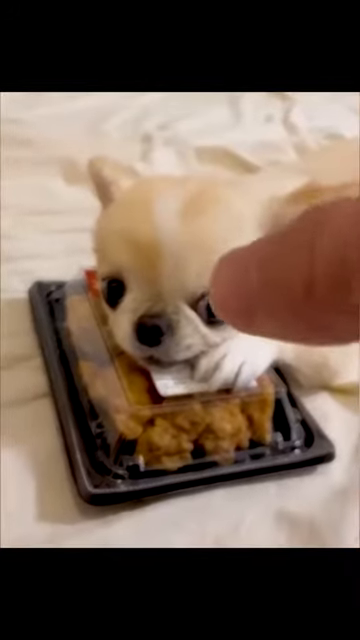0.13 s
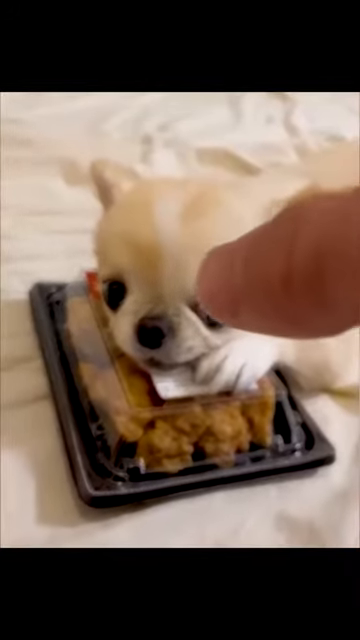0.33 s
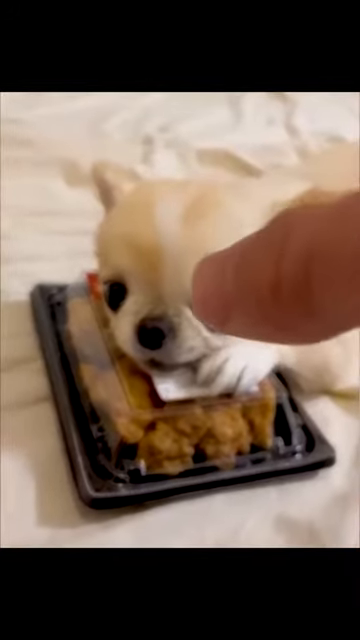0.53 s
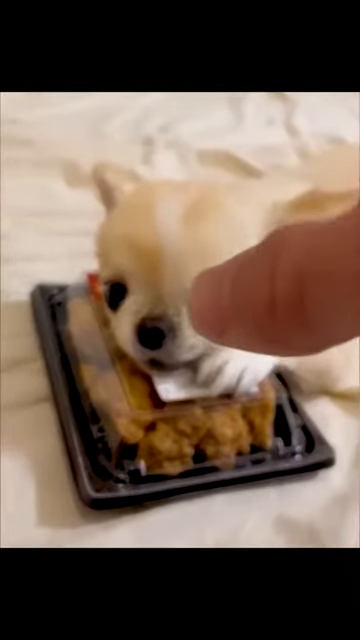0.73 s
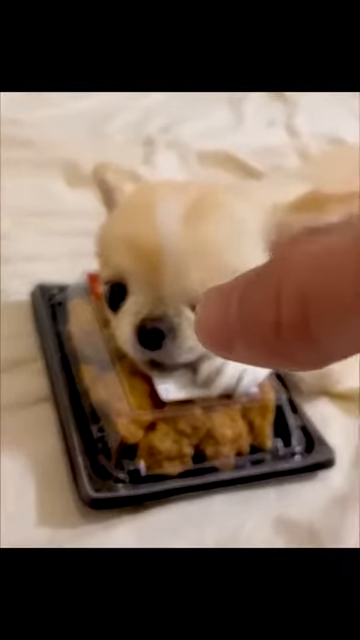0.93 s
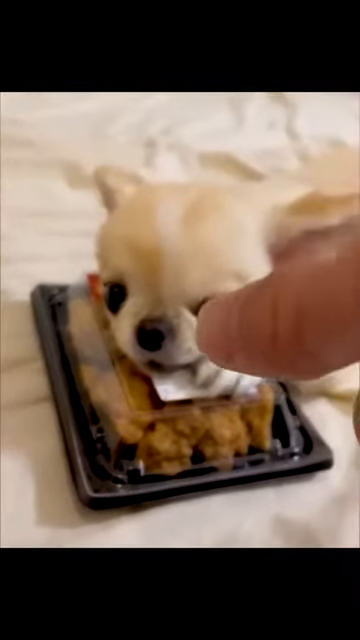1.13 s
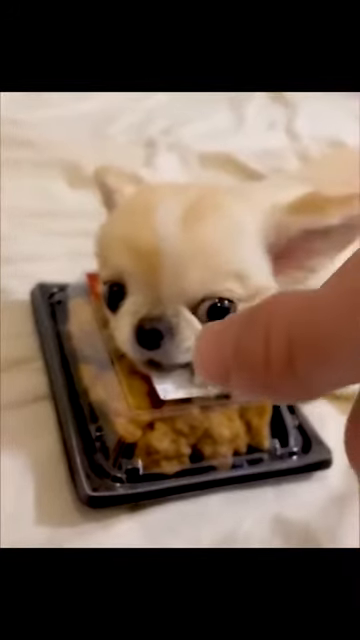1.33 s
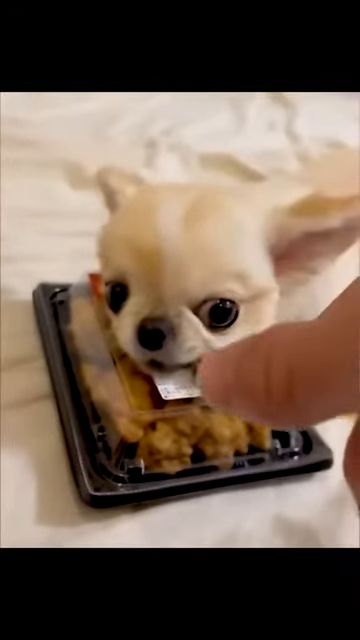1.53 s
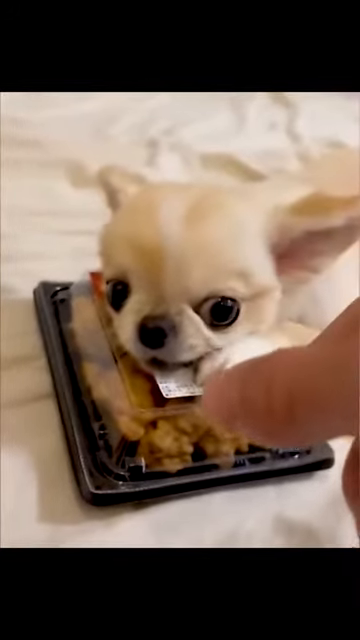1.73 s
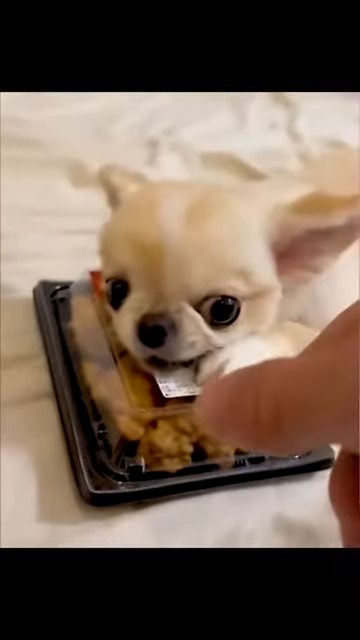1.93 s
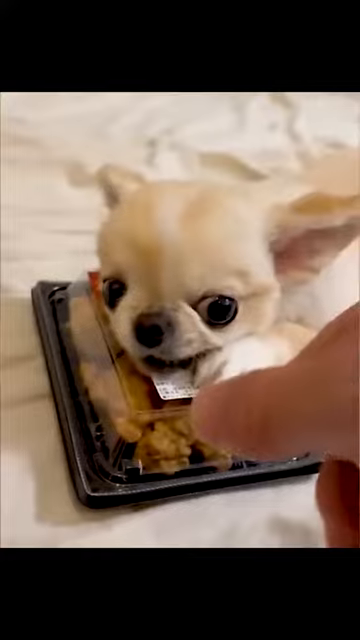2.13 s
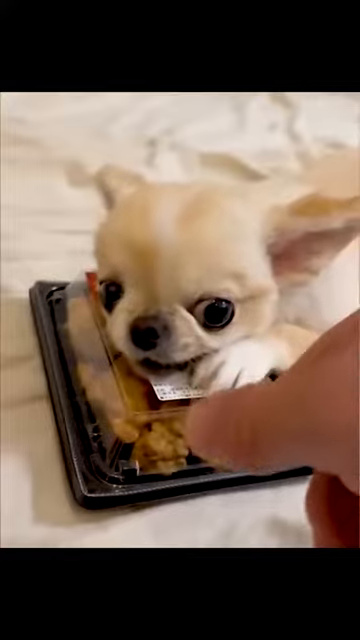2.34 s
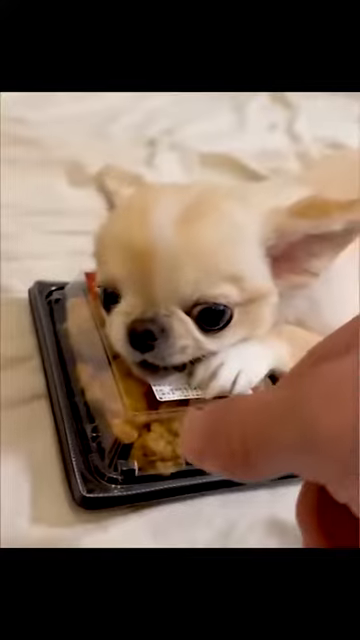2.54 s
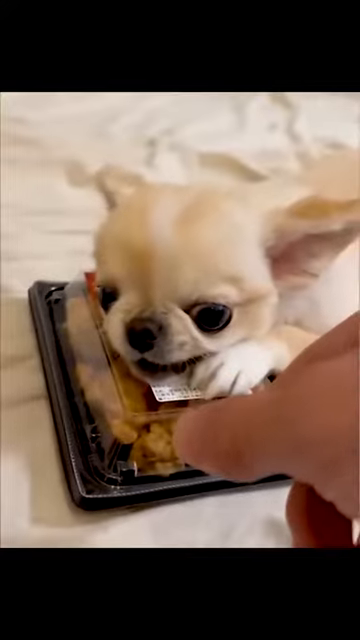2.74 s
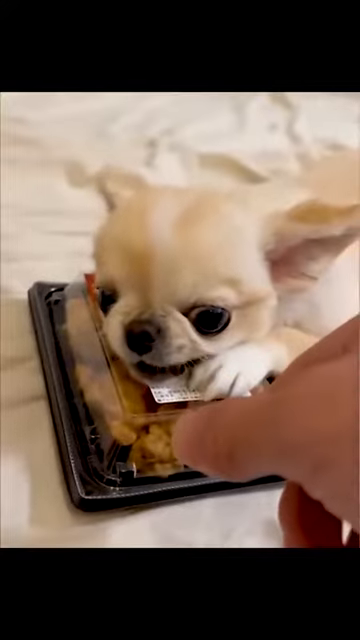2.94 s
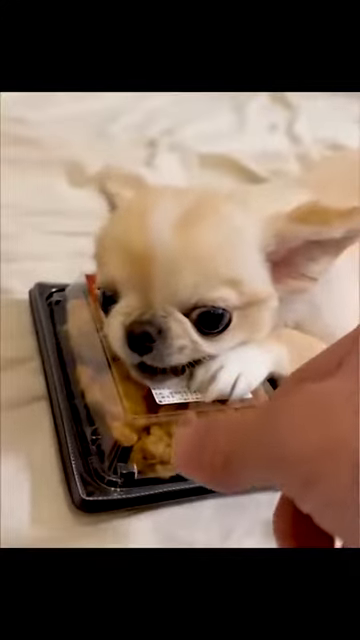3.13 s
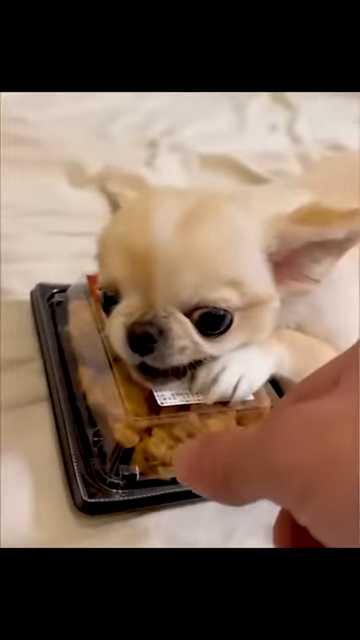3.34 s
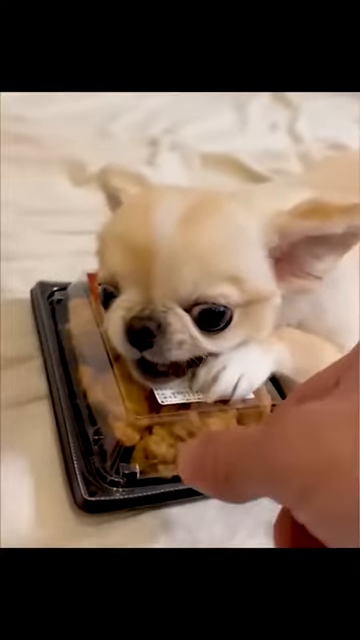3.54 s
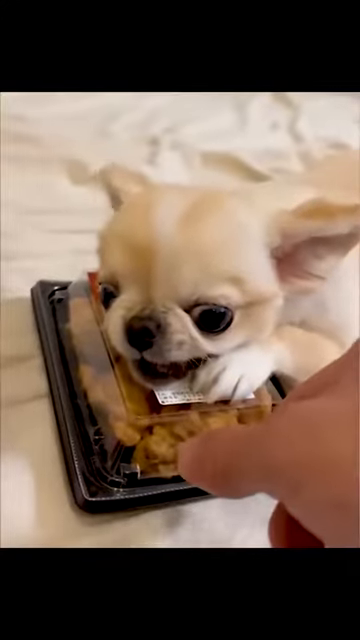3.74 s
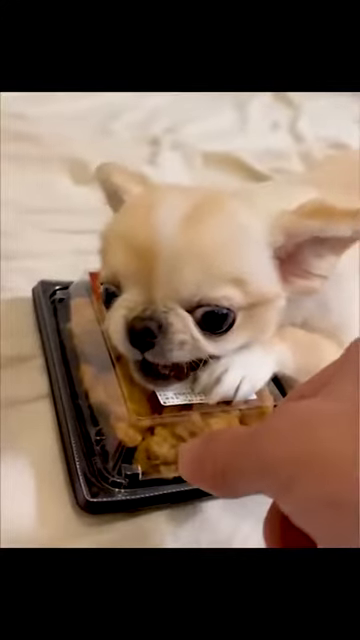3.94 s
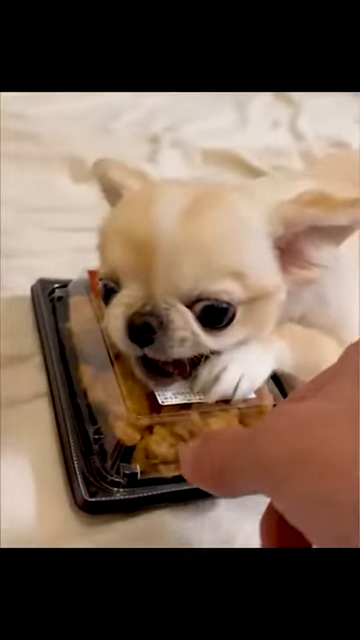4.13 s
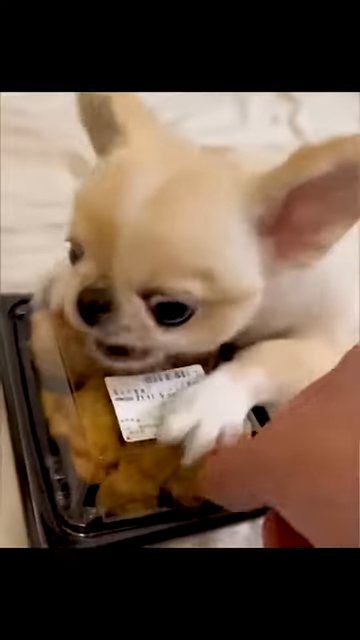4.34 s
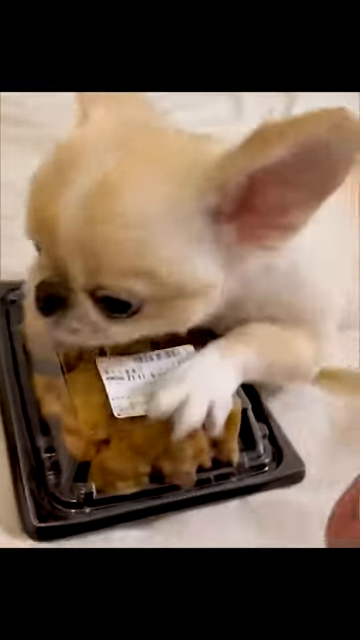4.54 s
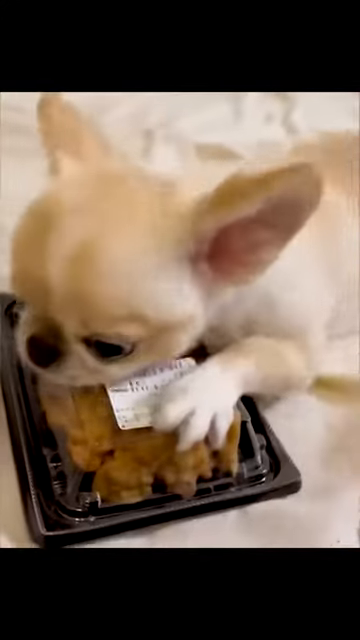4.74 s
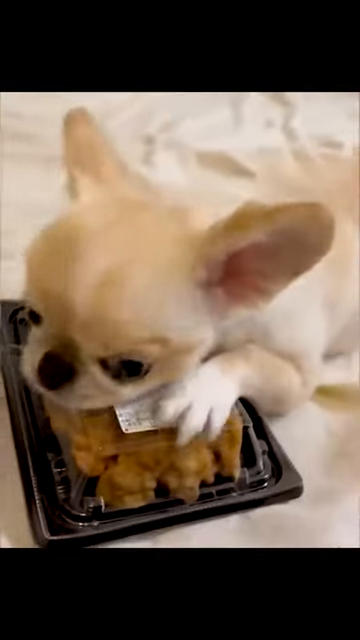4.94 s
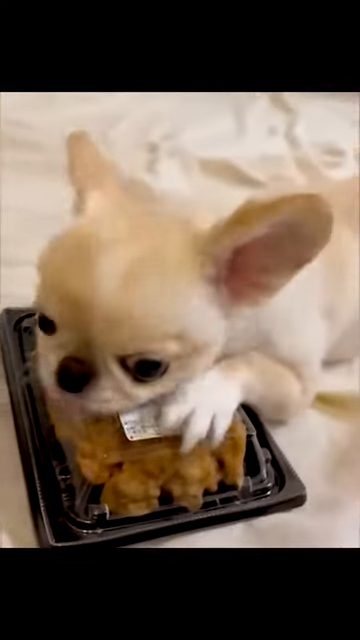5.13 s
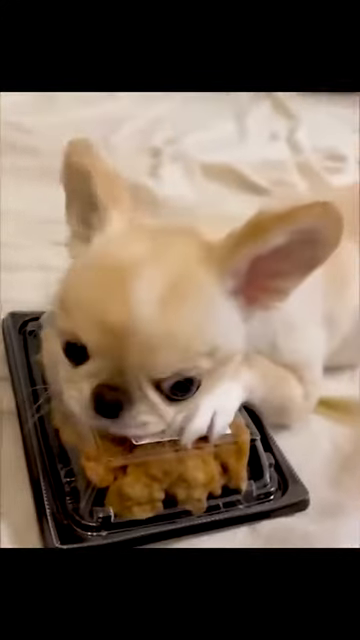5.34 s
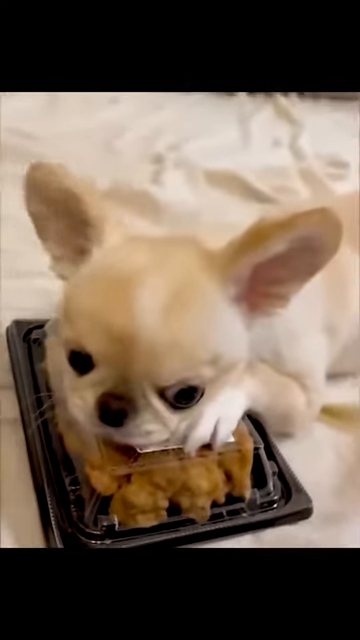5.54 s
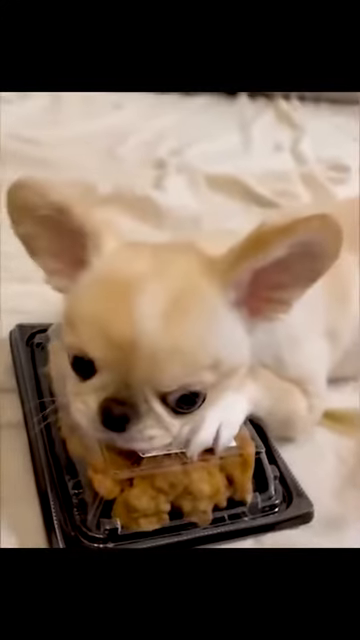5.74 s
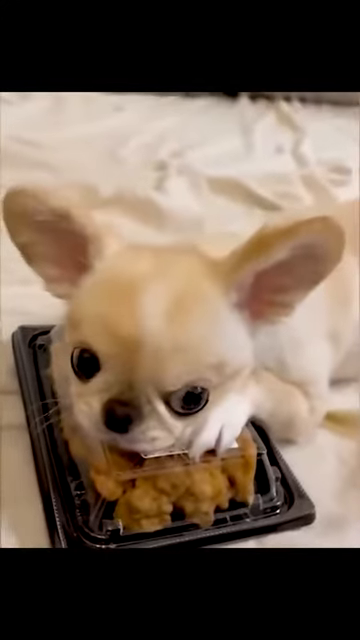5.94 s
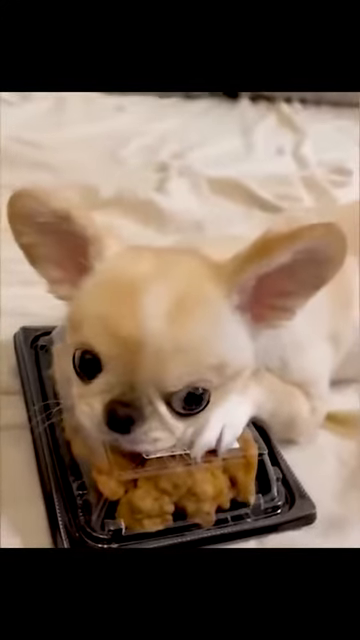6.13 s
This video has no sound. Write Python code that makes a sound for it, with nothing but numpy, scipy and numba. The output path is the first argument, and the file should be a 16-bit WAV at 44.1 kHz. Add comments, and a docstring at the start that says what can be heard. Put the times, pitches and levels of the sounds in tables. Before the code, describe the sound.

Faint squeaky nose wheezes from a tiny dog in a quiet room, then a fluttering growl, loud snarling lunge, muffled grumble and lip smacks.

```python
"""Faint squeaks and wheezes from a tiny dog's nose, over room air and low rumble, then its growl.
It guards a plastic food tray on a bed, a hand's width from a phone in a quiet room.
Nose: a pulsed reed, hiss and whistle. Growl: fast vocal pulses chopped by a flapping palate ring chest,
throat, mouth and teeth: an open-mouthed snarl, a rough lunge, a closed-mouth grumble, a few lip smacks.
Bedding thumps (band noise) start with the lunge; a faint fading hiss (band noise) comes near the end."""
import sys
import numpy as np
from scipy import signal
from scipy.fft import rfft, irfft
from scipy.io import wavfile
from scipy.ndimage import uniform_filter1d
from numba import njit

SR = 44100
rng = np.random.default_rng(int(sys.argv[2]) if len(sys.argv) > 2 else 0)


def gain_from_decibels(decibels):
    """Convert decibel values to linear amplitude factors."""
    exponent = np.asarray(decibels, float) / 20
    return 10 ** exponent


def dump_mix(stems):
    """Bounce the given channels to the path in sys.argv[1] as a 16-bit WAV at rate SR."""
    frames = np.atleast_2d(stems).T  # one column per channel
    limited = np.clip(frames, -1, 1)  # hard clip at full scale
    pcm = np.round(limited * 32767).astype(np.int16)
    wavfile.write(sys.argv[1], SR, pcm)


N = 276507
T = np.arange(N) / SR


def curve(table):
    """Columns of a table, joined by straight lines in time."""
    s, *columns = np.transpose(table)
    return [np.interp(T, s, c) for c in columns]


def smooth(x, span_s):
    """Running mean."""
    return uniform_filter1d(x, int(span_s * SR))


def steady(x, span_s=0.014):
    """Divide by the running rms."""
    return x / np.sqrt(smooth(x ** 2, span_s) + 1e-12)


def wobble(rate_hz):
    """Random levels held 1 / rate_hz seconds and slewed twice; spread 1."""
    k = int(SR / rate_hz)
    held = np.repeat(rng.standard_normal(N // k + 1), k)
    x = uniform_filter1d(uniform_filter1d(held, k), k)[:N]
    return x / x.std()


def colour(x, points):
    """Apply a (frequency [Hz], level [dB]) spectrum, straight in log frequency."""
    hz, db = np.transpose(points)
    f = np.maximum(np.arange(N // 2 + 1) * SR / N, 1)
    return irfft(rfft(x) * gain_from_decibels(np.interp(np.log(f), np.log(hz), db)), N)


def band(x, low_hz, high_hz):
    """Steep band-pass."""
    edges_hz = [low_hz, min(high_hz, .45 * SR)]
    return signal.sosfilt(signal.butter(3, edges_hz, "band", fs=SR, output="sos"), x)


@njit
def svf(x, hz, width):
    """State-variable band-pass with moving centre and width, gain 1 at the centre."""
    y, b, l = np.empty(len(x)), 0., 0.
    for i in range(len(x)):
        g, k = np.tan(np.pi * hz[i] / SR), width[i] / hz[i]
        v = (b + g * (x[i] - l)) / (1 + g * (g + k))
        b, l, y[i] = 2 * v - b, l + 2 * g * v, k * v
    return y


def mode(x, hz, width_hz, db):
    """Fixed resonance, applied twice for deep valleys."""
    hz, width_hz = np.full(N, 1. * hz), np.full(N, 1. * width_hz)
    return gain_from_decibels(db) * svf(svf(x, hz, width_hz), hz, width_hz)


@njit
def folds(hz, start, jitter, scatter_db, chance):
    """A pulse at each wrap of the phase, with random cycle length and size; a start fires at once."""
    pulses, phase, p, k = np.zeros(len(hz) + 1), np.empty(len(hz)), 0., 0
    for i in range(len(hz)):
        step = hz[i] * np.exp(jitter[i] * chance[k, 0]) / SR
        p = 1. if start[i] else p + step
        if p >= 1:
            p, k = p - 1, k + 1
            size = 10 ** (scatter_db[i] * chance[k, 1] / 20)
            # split over two samples for sub-sample timing
            pulses[i] += size * p / step
            pulses[i + 1] += size * (1 - p / step)
        phase[i] = p
    return pulses[:-1], phase


def buzz(hz, rough, start, jitter, scatter_db, puff):
    """Vocal pulses, and the puff of turbulent air that follows each; both of rms 1."""
    chance = rng.standard_normal((N // 20, 2))
    pulses, phase = folds(hz, start, jitter * rough, scatter_db * rough, chance)
    return steady(pulses), steady(np.exp(-phase / puff) * rng.standard_normal(N))


def openings(rows):
    """First and last sample, progress 0-1 and remaining columns of each opening."""
    for s, length_s, *rest in rows:
        a, b = int(s * SR), int((s + length_s) * SR) + 1
        yield a, b, np.linspace(0, 1, b - a), rest


def pair(likeness):
    """Noise for two microphone ports, partly shared."""
    mid, side = rng.standard_normal((2, N))
    shared = np.sqrt((1 + likeness) / 2) * mid
    return shared + np.sqrt((1 - likeness) / 2) * side * np.array([[1], [-1]])


def band_pair(likeness, low_hz, high_hz):
    """Band noise of rms 1 at two ports."""
    noise = band(pair(likeness), low_hz, high_hz)
    return noise / noise.std()


# room air spectrum: (frequency [Hz], relative level [dB per Hz])
AIR_SPECTRUM = [(60, -6), (110, 4.5), (170, -6.5), (300, -6.5), (700, -14), (1200, -19.5), (2000, -27),
                (4000, -34), (10000, -34), (12500, -42.5), (15500, -57)]
AIR_RMS_DB = -69


def room_air():
    """Coloured steady noise, largely shared by the ports."""
    air = np.array([colour(c, AIR_SPECTRUM) for c in pair(0.68)])
    return gain_from_decibels(AIR_RMS_DB) * air / air.std()


# rumble: (time [s], level [dB])
RUMBLE_LEVEL = [(0, -73), (.75, -67.5), (2.6, -66.5), (3.44, -80), (4.14, -64), (4.59, -45), (5.19, -59),
                (5.9, -74), (6.27, -69)]
RUMBLE_WAVER_DB = 3


def rumble():
    """Low band noise of wavering level."""
    level_db, = curve(RUMBLE_LEVEL)
    return gain_from_decibels(level_db + RUMBLE_WAVER_DB * wobble(3)) * band_pair(0.5, 38., 79.0)


# clear nose squeaks: (time [s], length [s], level [dB], start pitch [Hz], end pitch [Hz])
NOSE_SQUEAKS = [(0.053, .008, -58, 884, 880), (0.104, .004, -63, 940, 900), (0.143, .008, -59, 904, 936),
                (.184, .005, -62, 900, 900), (0.268, .011, -62, 795, 817), (.31, .006, -58.5, 914, 950),
                (.582, .019, -55.5, 1050, 743), (1.515, .012, -54.5, 1153, 1138),
                (1.591, 0.031, -61, 1550, 1386), (1.626, .012, -57, 1437, 1100),
                (1.644, .028, -58.5, 1184, 1143), (1.778, .025, -58, 819, 920),
                (1.935, .022, -61, 1198, 931), (1.974, .016, -65, 960, 880)]
# raspy wheezes: (time [s], length [s], level [dB], mid pitch [Hz])
NOSE_WHEEZES = [(0.531, 0.029, -57, 849), (0.622, 0.071, -61, 1111), (0.7, 0.025, -56, 989),
                (0.75, .017, -59.5, 1038), (.789, 0.032, -61.5, 899), (.825, .035, -68, 900),
                (.867, .04, -61.5, 800), (.912, .07, -58.5, 947), (0.993, 0.026, -56.5, 931),
                (1.037, .026, -57.5, 958), (1.081, 0.057, -60, 1062), (1.146, 0.05, -56.5, 889),
                (1.214, .084, -60.5, 910), (1.301, .018, -61, 1142), (1.355, 0.021, -62, 1303),
                (1.38, 0.11, -60.5, 870), (1.695, .017, -60, 1033), (1.735, 0.029, -58.5, 1003),
                (1.825, 0.055, -60.5, 962)]
# warble: squeaks gliding up and down in turn
WARBLE_S, GLIDE_S, WARBLE_DB = .402, .0212, -59.5
UP_HZ, DOWN_HZ = (800, 1040), (1049, 640.4)  # (from, to)
SQUEAK_ROUGH, WHEEZE_ROUGH = .1, .42  # 0-1
WHEEZE_RISE = .07  # share climbed either side of mid pitch


def nose_rows(count=6):
    """Squeaks, warble and wheezes as (s, length s, dB, Hz at start, Hz at end, roughness)."""
    warble = [(WARBLE_S + k * GLIDE_S, GLIDE_S, WARBLE_DB, *(DOWN_HZ if k % 2 else UP_HZ))
              for k in range(count)]
    squeaks = [(*row, SQUEAK_ROUGH) for row in NOSE_SQUEAKS + warble]
    wheezes = [(s, length_s, db, hz * (1 - WHEEZE_RISE), hz * (1 + WHEEZE_RISE), WHEEZE_ROUGH)
               for s, length_s, db, hz in NOSE_WHEEZES]
    return sorted(squeaks + wheezes)


# nose spectrum: (frequency [Hz], level [dB])
NOSE_SPECTRUM = [(450, -15), (750, -6), (930, 2), (1200, -5), (1700, -10.5), (2700, -16), (3200, -24.5),
                 (5000, -39.5)]
# drifting whistle of nostril air: (time [s], centre [Hz], level re nose openings before roughness [dB])
NOSTRIL_WHISTLE = [(.4, 4570, -19), (.7, 4300, -17), (.8, 3960, -14), (.9, 4340, -15), (1.2, 4450, -12.5),
                   (1.45, 4023, -15), (1.6, 4400, -9.5), (1.9, 3960, -20)]


def wheeze():
    """A thin squeaky reed in the nose, gliding over each opening, with a hiss of air that lingers."""
    gate, hz, rough = np.zeros(N), np.full(N, 900.), np.zeros(N)
    for a, b, u, (db, hz0, hz1, r) in openings(nose_rows()):
        gate[a:b], hz[a:b], rough[a:b] = gain_from_decibels(db), hz0 + (hz1 - hz0) * u, r
    hz = smooth(hz, 0.0012)
    pulses, air = buzz(hz, rough, np.zeros(N, bool), jitter=0.18, scatter_db=19.0, puff=0.98)
    source = np.sqrt(1 - rough) * pulses + np.sqrt(rough) * air
    reed = smooth(gate, 0.005) * steady(colour(source, NOSE_SPECTRUM), span_s=0.011)

    whistle_hz, whistle_db = curve(NOSTRIL_WHISTLE)
    tone = svf(rng.standard_normal(N), whistle_hz, whistle_hz / 7)
    tone = steady(svf(tone, whistle_hz, whistle_hz / 5))
    whistle = gain_from_decibels(whistle_db) * smooth(gate * np.sqrt(rough), 0.022) * tone

    hiss = steady(colour(rng.standard_normal(N), NOSE_SPECTRUM))
    hiss = gain_from_decibels(2.0) * smooth(gate * rough, .06) * hiss
    return reed + hiss + whistle


# port imbalance: (frequency [Hz], left minus right level [dB])
PORT_BALANCE = [(60, 3.5), (110, 0), (200, 3), (380, -9.5), (700, -2), (1290, -6), (2380, -4), (4400, -11),
                (8120, -1), (15000, 1.5)]


def direct_sound(dog):
    """The dog sits a little to the right: ports differ in spectrum, the left is one sample further off."""
    hz, db = np.transpose(PORT_BALANCE)
    left, right = (colour(dog, np.transpose([hz, side * db / 2])) for side in (1, -1))
    return np.array([np.roll(left, 1), right])


def tail(db, t60_s, low_hz, high_hz):
    """Decaying scattered reflections, unlike at the two ports."""
    t = T[:SR // 2]
    echo = band(rng.standard_normal((2, len(t))), low_hz, high_hz) * gain_from_decibels(-60 * t / t60_s)
    return gain_from_decibels(db) * echo / np.sqrt(np.sum(echo ** 2, axis=1, keepdims=True))


def reflections(dog):
    """The tray scatters treble; the soft room answers briefly."""
    tray = tail(db=-8, t60_s=0.11, low_hz=1989.5, high_hz=12994.5)
    room = tail(db=-19, t60_s=0.36, low_hz=149.5, high_hz=6998)
    return signal.fftconvolve(dog[None], tray + room, axes=1)[:, :N]


# palate open: (time [s], length [s], level before swell [dB], pulse rate before arch and break [Hz])
PALATE_FLAPS = [(2.237, 0.0024, -36, 269), (2.265, 0.016, -27, 275.5), (2.316, 0.0077, -27.5, 266.6),
                (2.364, .007, -27.5, 290), (2.395, 0.027, -27, 281), (2.435, 0.048, -29, 275.4),
                (2.477, 0.046, -30.5, 265.5), (2.524, 0.036, -30, 274.2), (2.568, 0.032, -32, 281.8),
                (2.623, 0.028, -30, 282.8), (2.673, .02, -28.5, 260), (2.72, .016, -29, 248.3),
                (2.771, .011, -28, 263), (2.811, 0.022, -29, 262), (2.862, 0.019, -30.5, 254),
                (2.888, .029, -28.5, 275), (2.958, 0.018, -27.5, 248.6), (2.98, 0.039, -29.5, 271.3),
                (3.02, 0.037, -30.5, 261.8), (3.084, 0.0091, -28.5, 245), (3.102, 0.044, -29.5, 250),
                (3.149, 0.028, -35, 233), (3.218, .003, -29, 238.7), (3.242, 0.0049, -26.5, 233.5),
                (3.338, 0.0022, -27.5, 236.4), (3.419, 0.0042, -25, 223.2), (3.463, 0.0042, -25, 246.3),
                (3.501, 0.012, -27.5, 261.4), (3.543, .016, -25.5, 300), (3.572, 0.035, -20.5, 331.6),
                (3.609, 0.036, -20.5, 322), (3.642, 0.0019, -27.5, 315), (3.652, 0.035, -18.5, 322),
                (3.687, 0.046, -16, 334.6), (3.735, .048, -17, 315.4), (3.788, 0.066, -18, 327.2),
                (3.852, 0.047, -17.5, 310.6), (3.922, .027, -16, 306), (3.967, 0.03, -18.5, 300.5),
                (3.995, 0.048, -18.5, 294.5), (4.033, 0.034, -19.5, 288.1), (4.098, 0.026, -16.5, 289.6),
                (4.122, .04, -19.5, 279), (4.162, 0.029, -24.5, 276.8), (4.218, 0.043, -35, 150),
                (4.249, 0.031, -22, 129.7), (4.281, 0.068, -17.5, 117.9), (4.34, .054, -16.5, 125),
                (4.394, .014, -16, 117.4), (4.49, 0.0016, -21.5, 259), (4.517, 0.03, -21.5, 264),
                (4.556, 0.039, -36, 169.9), (4.631, 0.054, -40.5, 175.3), (4.691, 0.028, -33, 213.6),
                (4.74, .031, -29, 237), (4.789, 0.032, -29.5, 242.6), (4.846, 0.03, -27.5, 247.7),
                (4.902, 0.044, -38.5, 226.3), (4.953, .043, -31, 232.2), (4.996, 0.055, -38.5, 213),
                (5.052, 0.032, -32, 209.4), (5.111, 0.039, -33.5, 181.3), (5.164, 0.032, -33.5, 172.1),
                (5.239, 0.054, -33, 125.1), (5.296, .04, -50.5, 151.3), (5.348, 0.0017, -50.5, 113.6),
                (5.375, 0.0027, -40, 116.9), (5.453, 0.0043, -35.5, 114.6), (5.875, 0.065, -67.5, 113.3)]
ARCH = .17  # share by which pitch bows up in an opening
CLICK_S = .006  # openings no longer than this stay sharp
BREAK_S, BREAK_LENGTH_S, BREAK_OCTAVES = 4.15, 0.065, 0.76  # out of air: pitch falls


def palate(shut, swell_db):
    """Flapping palate: gate, onsets, pulse rate, progress through openings and softness of their edges."""
    gate, start, through = np.zeros(N), np.zeros(N, bool), np.zeros(N)
    hz, soft = np.full(N, 250.), shut.copy()
    for a, b, u, (db, rate_hz) in openings(PALATE_FLAPS):
        gate[a:b] = gain_from_decibels(db + swell_db[a] * (u - .5))
        start[a], hz[a:], through[a:b] = True, rate_hz, u
        soft[a:b] *= b - a > CLICK_S * SR
        # pressure peaks mid-opening, so the pitch arches
        hz[a:b] = rate_hz * (1 + ARCH * (np.sin(np.pi * u) - 2 / np.pi))
    fall = np.clip((T - BREAK_S) / BREAK_LENGTH_S, 0, 1) ** 2 * (T < BREAK_S + BREAK_LENGTH_S)
    hz = hz / 2 ** (BREAK_OCTAVES * fall)
    hz = hz * (1 + (.015 + .02 * shut) * wobble(45))
    # behind shut lips each opening swells and fades
    swelling = smooth(gate * (.65 + .55 * np.sin(np.pi * through)), .008)
    gate = (1 - soft) * gate + soft * swelling
    return gate * gain_from_decibels(1.1 * wobble(50)), start, hz, through, soft


# nostril resonances: (centre [Hz], width per pass [Hz], level [dB])
NOSTRIL_MODES = [(3170, 1300, 4.5), (4266, 610, -9), (5435, 1700, 1), (9260, 5600, 1.5), (10200, 1600, -9)]
# teeth resonances: (centre [Hz], width per pass [Hz], level [dB])
TEETH_MODES = [(3146, 650, -6), (4656, 1450, 1), (6714, 1100, 0.5), (8634, 1790, 0), (11370, 1200, -11.5)]
TEETH_FROM_HZ, TOP_HZ = 2100., 12200.
HEAD_DOWN_S = 4.5  # after the lunge treble leaves by the nostrils
PATCHY_DB, PATCHY_RATE_HZ = 5, 22  # each nostril resonance flickers on its own


def treble_ring(shut, rough):
    """Filter for bared teeth, flickering nostrils and the washed-out treble of a rough, wide mouth."""
    nasal = np.maximum(shut, T > HEAD_DOWN_S)
    bared = (1 - nasal) * (1 - .8 * rough)
    gape = 1.2 * (1 - shut) * rough ** 2
    patches = [nasal * gain_from_decibels(PATCHY_DB * wobble(PATCHY_RATE_HZ)) for _ in NOSTRIL_MODES]
    patches[0] = shut * patches[0]  # the lowest one needs shut lips

    def ring(x):
        teeth = bared * sum(mode(x, *row) for row in TEETH_MODES)
        nostrils = sum(p * mode(x, *row) for p, row in zip(patches, NOSTRIL_MODES))
        return band(teeth + nostrils + gape * band(x, 3400.0, 6000.), TEETH_FROM_HZ, TOP_HZ)
    return ring


# posture: (time [s], throat [Hz], mouth [Hz], mouth width [Hz], roughness [0-1], lips shut [0-1])
MOUTH_POSTURE = [(2.24, 900, 1320, 260, .12, .4), (2.26, 900, 1340, 280, .12, 0),
                 (2.45, 870, 1450, 380, .17, 0), (3.1, 930, 1340, 230, .16, 0),
                 (3.5, 900, 1380, 220, .12, 0), (3.6, 800, 1650, 150, .13, .05),
                 (3.7, 760, 1830, 110, .085, .15), (4.13, 720, 1870, 100, .08, .2),
                 (4.19, 700, 1700, 250, .12, .55), (4.215, 700, 1690, 270, .9, .5),
                 (4.27, 620, 1680, 300, .8, .2), (4.4, 550, 1570, 130, .6, .1),
                 (4.49, 800, 1470, 150, .1, .1), (4.535, 800, 1250, 180, .14, .2),
                 (4.56, 720, 1240, 500, .6, 1), (4.65, 390, 1400, 700, .28, 1),
                 (4.71, 450, 1500, 700, .1, 1), (4.79, 520, 1400, 500, .1, 1),
                 (4.83, 900, 1200, 500, .1, 1), (4.87, 1000, 1400, 600, .08, 1),
                 (4.98, 480, 1300, 600, .12, 1), (5.07, 660, 1500, 700, .15, 1),
                 (5.13, 700, 1300, 800, .3, .9), (5.2, 750, 1400, 800, .25, .9),
                 (5.24, 300, 1100, 800, .2, .75), (5.3, 250, 1000, 800, .3, .9),
                 (5.35, 600, 1500, 350, .1, .5), (5.45, 800, 1400, 600, .1, .8),
                 (5.85, 800, 1700, 600, .95, .5)]
SWELL_DB, THROAT_WIDTH_HZ = (2, -3.5), (620, 250)  # (lips parted, lips shut); swell: rise through an opening
GAPE_HZ = (1400, 1860)  # mouth resonance at rest, at full gape
# shares of the voice: (chest, throat, mouth, teeth)
PARTED_DB, SHUT_DB = (-16.5, -6, -2.5, -8), (-1.5, -0.5, -16.5, -22)
GAPE_DB, ROUGH_DB = (-6, -6, 4.5, 0.5), (12.5, -4, 0, 1.5)  # added at full gape, full roughness
LIFT_DB_PER_KHZ, THROAT_REST_HZ = (-8, 2.5, 2.5, 6), 600  # lips shut: added as throat climbs above rest
LEAK_DB, LEAK_SHUT_DB, LEAK_RATE_PER_S = -22.5, 20, 32  # lips parted; added with lips shut; fading
SMACK_TREBLE_DB = -9.5  # clicks with the head down are dull


def growl():
    """Pulses and turbulence, let through while the palate is open, ring chest, throat, mouth and teeth."""
    throat_hz, mouth_hz, mouth_width, rough, shut = curve(MOUTH_POSTURE)

    def blend(parted, closed):
        return parted + shut * (closed - parted)

    throat_width = blend(*THROAT_WIDTH_HZ)
    wide = (1 - shut) * np.interp(mouth_hz, GAPE_HZ, [0, 1])
    climb_khz = shut * (throat_hz - THROAT_REST_HZ) / 1e3
    shares_db = [blend(p, s) + g * wide + r * rough + k * climb_khz
                 for p, s, g, r, k in zip(PARTED_DB, SHUT_DB, GAPE_DB, ROUGH_DB, LIFT_DB_PER_KHZ)]
    gate, start, hz, through, soft = palate(shut, blend(*SWELL_DB))
    smack = uniform_filter1d((soft < shut) * (T > HEAD_DOWN_S) * 1., SR // 500) > 0
    shares_db[-1] = shares_db[-1] + SMACK_TREBLE_DB * smack

    # behind shut lips the throat resonance climbs through each opening
    throat_hz = throat_hz * (1 + .14 * shut * smooth(through - .5, .01) + .02 * wobble(30))
    mouth_hz = mouth_hz * (1 + .08 * rough * wobble(30))
    pulses, air = buzz(hz, rough, start & (soft < .6), jitter=.16, scatter_db=9.,
                       puff=.35 + 2.5 * rough ** 2)
    # a little air leaks past the palate after it shuts
    fading = signal.lfilter([LEAK_RATE_PER_S / SR], [1, LEAK_RATE_PER_S / SR - 1], gate)
    leak = gain_from_decibels(LEAK_DB + LEAK_SHUT_DB * shut) * fading * rng.standard_normal(N)

    def chest(x):
        return svf(svf(x, hz, .5 * hz), hz, hz)

    def throat(x):
        return -svf(svf(x, throat_hz, throat_width), throat_hz, 2 * throat_width)

    def mouth(x):
        return svf(svf(x, mouth_hz, mouth_width), mouth_hz, np.full(N, 1100.))

    # (turbulence per roughness, resonator)
    parts = [(.12, chest), (1.1, throat), (2 + 2 * shut, mouth),
             (4.0 + 3 * shut, treble_ring(shut, rough))]
    out = 0
    for (airy, ring), db in zip(parts, shares_db):
        share = np.clip(airy * rough, 0, 1)  # turbulence wins towards the treble
        source = np.sqrt(1 - share) * pulses + np.sqrt(share) * air
        gain = gain_from_decibels(db) / np.sqrt(uniform_filter1d(ring(source) ** 2, SR // 30) + 1e-12)
        out = out + ring(gain * (gate * source + np.minimum(airy, 1) * leak))
    return out


# bedding thumps: (time [s], peak level [dB])
BED_THUMPS = [(4.39, -38), (4.56, -38), (4.62, -37.5), (4.779, -37), (5.07, -45.5), (5.21, -47)]
THUMP_RISE_S, THUMP_FADE_DB_PER_S = 0.026, 153.5


def thumps():
    """Bedding as the dog shifts: low noise rising to each peak, then decaying."""
    level = 0
    for s, db in BED_THUMPS:
        rise = np.clip(1 + (T - s) / THUMP_RISE_S, 0, 1)
        level = level + rise * gain_from_decibels(db - THUMP_FADE_DB_PER_S * np.maximum(T - s, 0))
    return level * band_pair(0.32, 60.0, 150.0)


HISS_S, HISS_END_S, HISS_RELEASE_S = 5.3, 5.93, .04  # start, start of release, release
HISS_DB, HISS_FADE_DB_PER_S = -64, 24


def late_hiss():
    """Faint fading band noise near the end, 1.5-6.4 kHz."""
    level = (T > HISS_S) * gain_from_decibels(HISS_DB - HISS_FADE_DB_PER_S * (T - HISS_S))
    release = np.clip((HISS_END_S - T) / HISS_RELEASE_S + 1, 0, 1)
    return level * release * band_pair(0.19, 1500., 6400.0)


def scene():
    """Dog, direct and reflected, over room, bedding and hiss."""
    background = room_air() + rumble() + thumps() + late_hiss()
    dog = wheeze() + growl()
    return direct_sound(dog) + reflections(dog) + background


def roll_off(x):
    """The treble ends steeply here."""
    return signal.sosfilt(signal.butter(12, 16490, fs=SR, output="sos"), x)


def record(dry):
    """The phone rounds the loudest peaks."""
    mix = np.tanh(0.59 * dry) / 0.61
    return roll_off(mix)


dry = scene()
out = record(dry)
dump_mix(out)
```